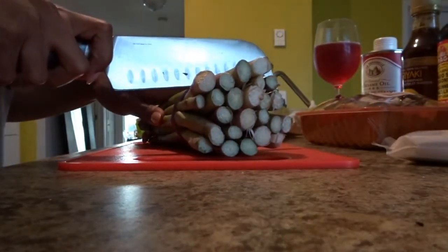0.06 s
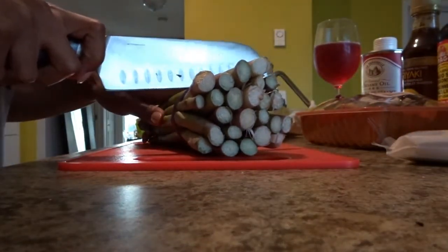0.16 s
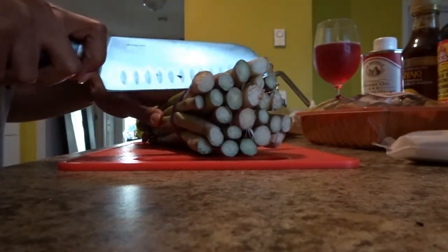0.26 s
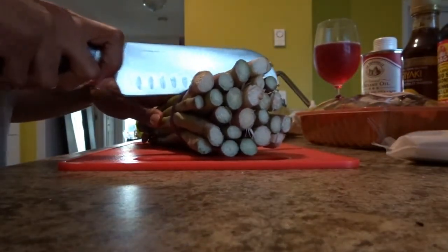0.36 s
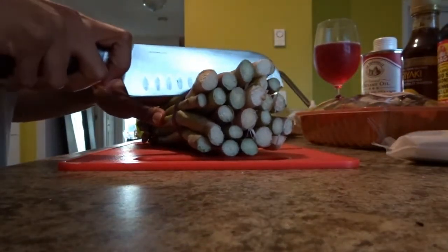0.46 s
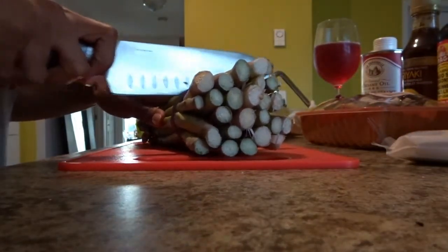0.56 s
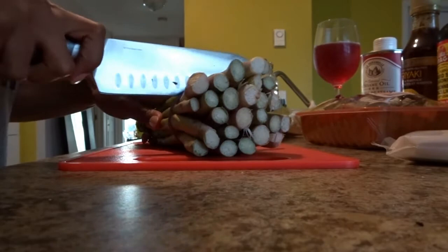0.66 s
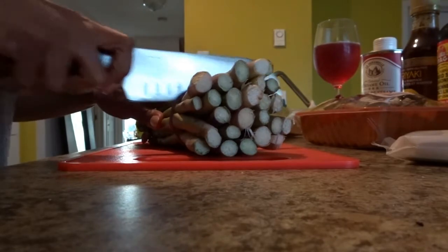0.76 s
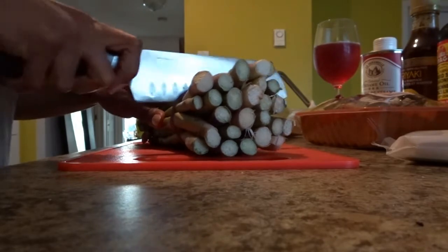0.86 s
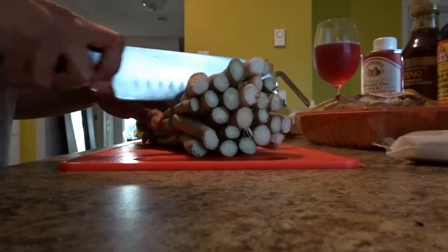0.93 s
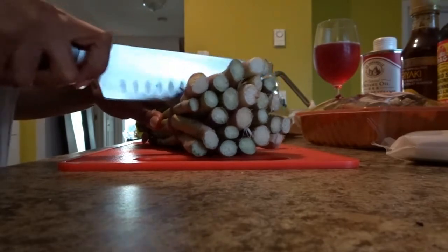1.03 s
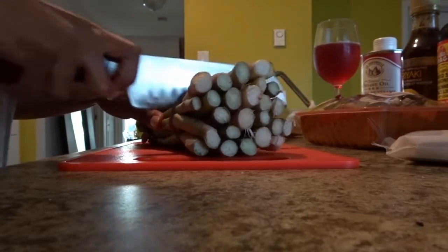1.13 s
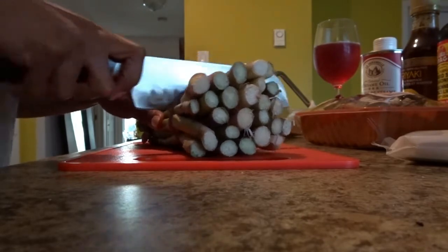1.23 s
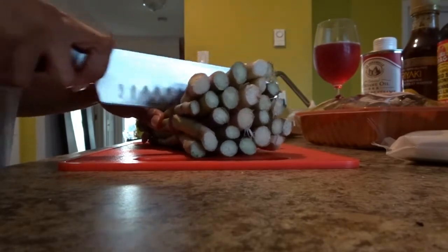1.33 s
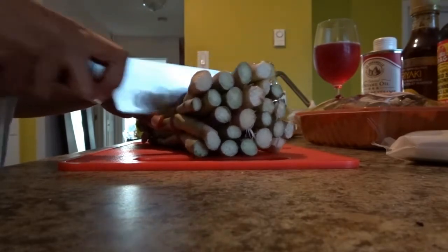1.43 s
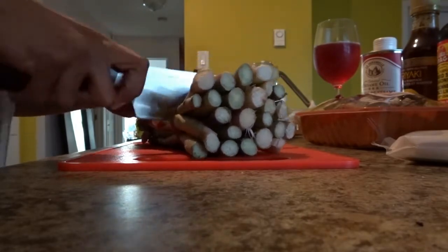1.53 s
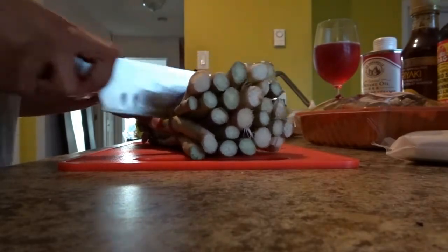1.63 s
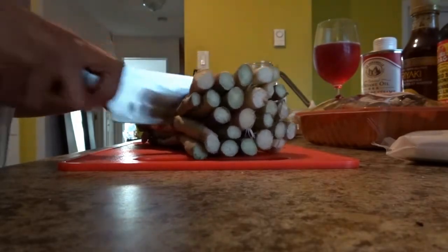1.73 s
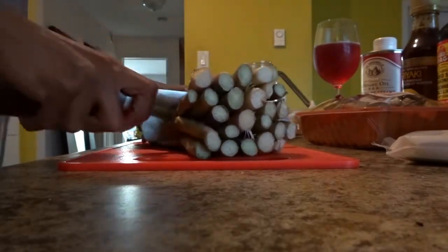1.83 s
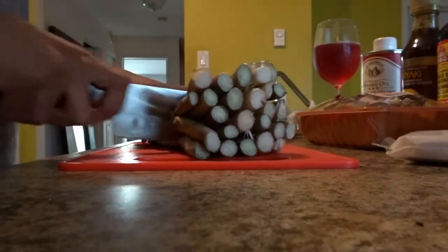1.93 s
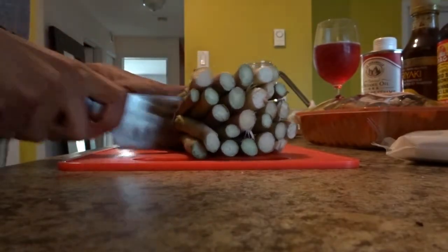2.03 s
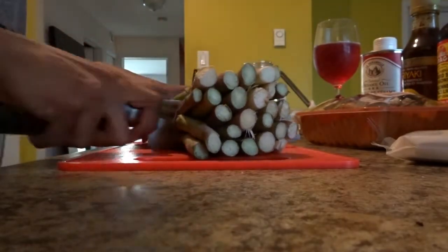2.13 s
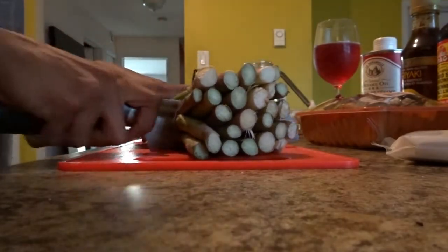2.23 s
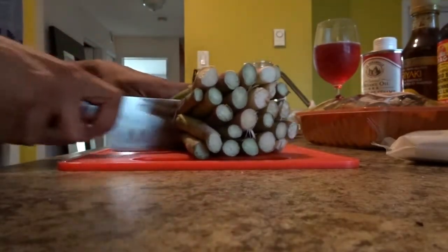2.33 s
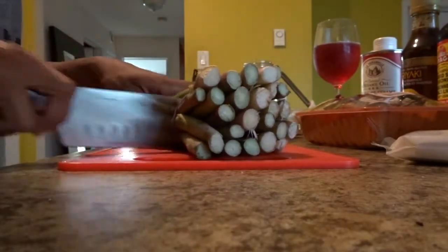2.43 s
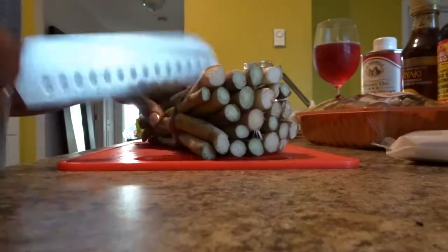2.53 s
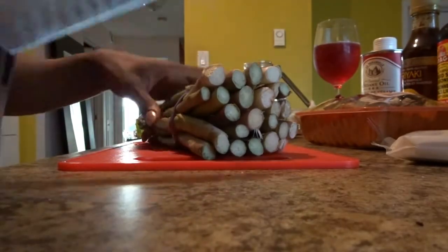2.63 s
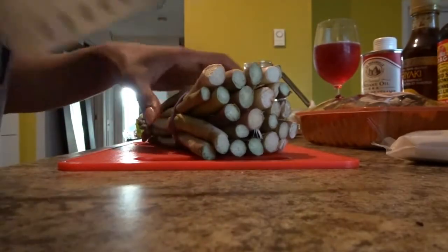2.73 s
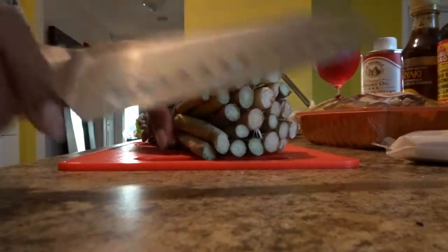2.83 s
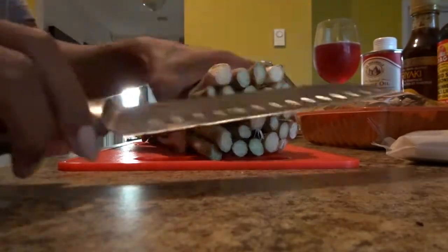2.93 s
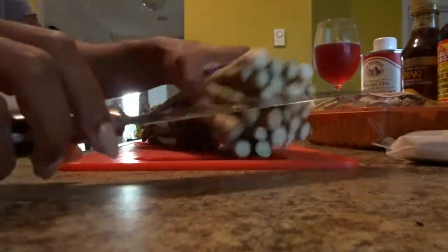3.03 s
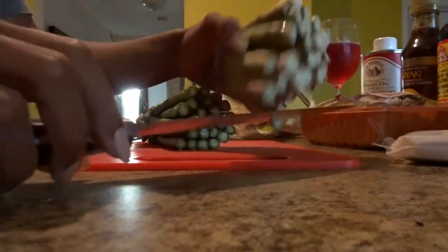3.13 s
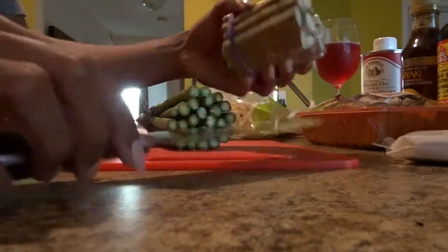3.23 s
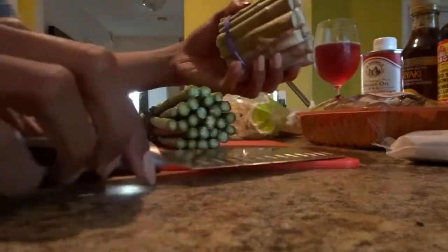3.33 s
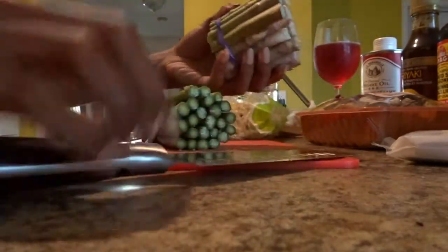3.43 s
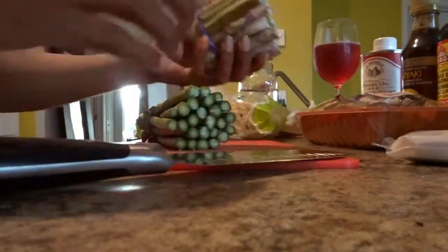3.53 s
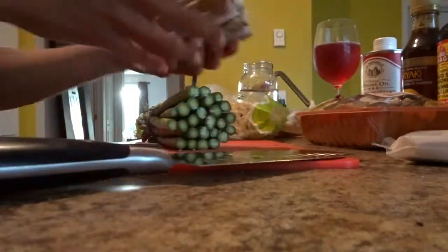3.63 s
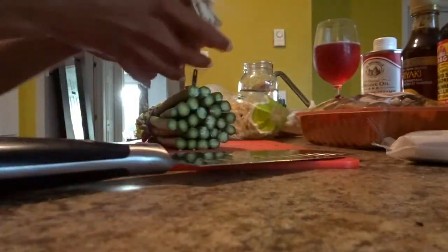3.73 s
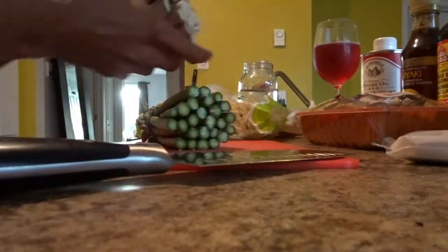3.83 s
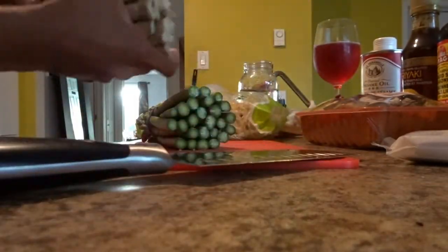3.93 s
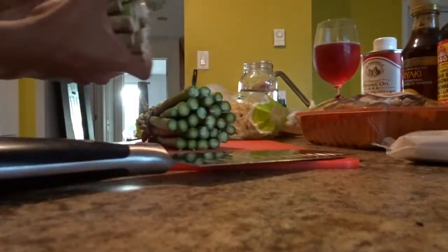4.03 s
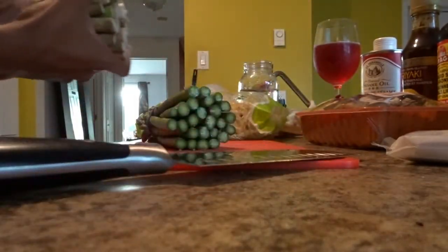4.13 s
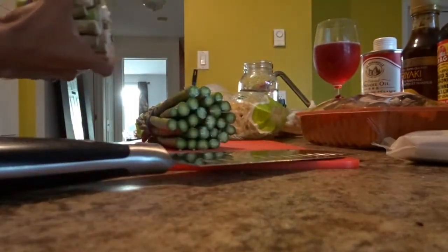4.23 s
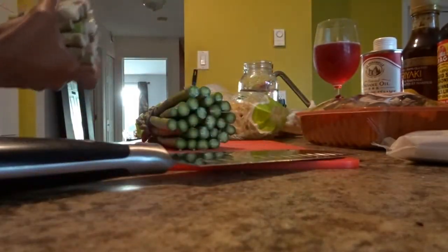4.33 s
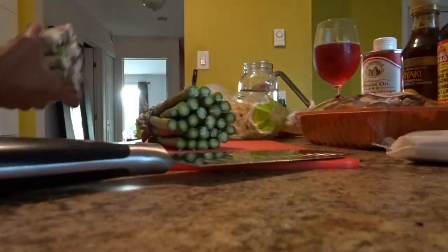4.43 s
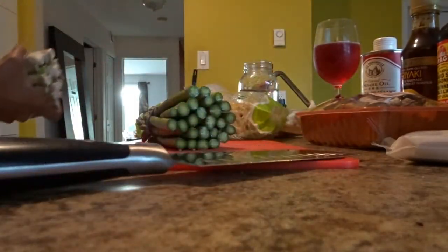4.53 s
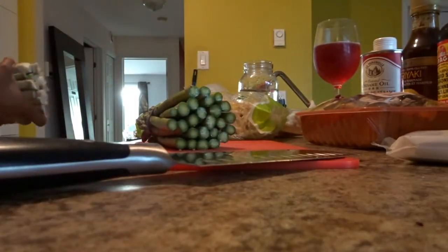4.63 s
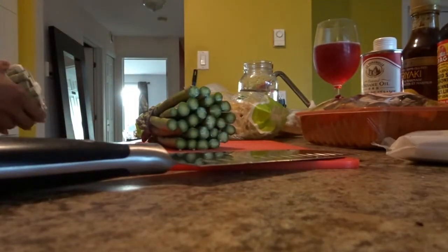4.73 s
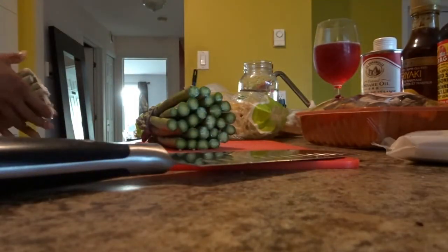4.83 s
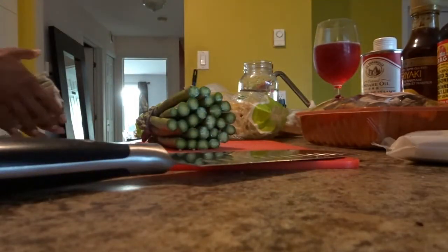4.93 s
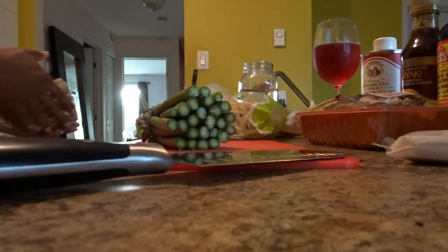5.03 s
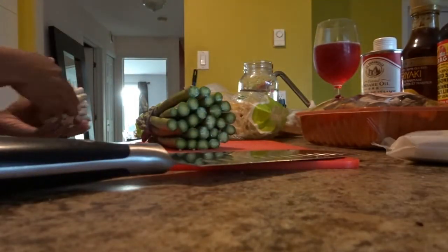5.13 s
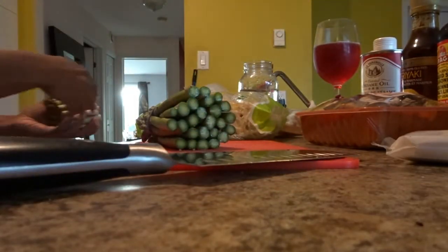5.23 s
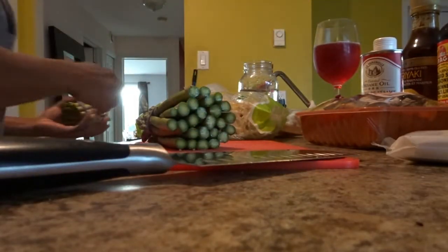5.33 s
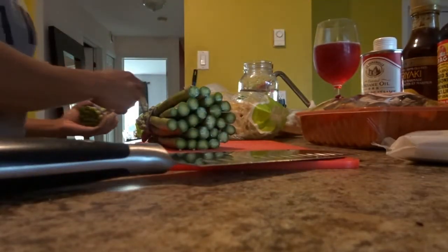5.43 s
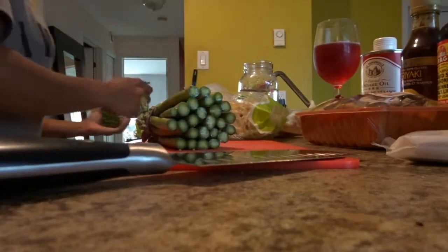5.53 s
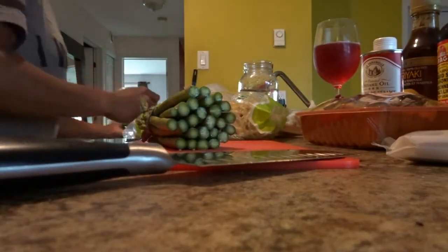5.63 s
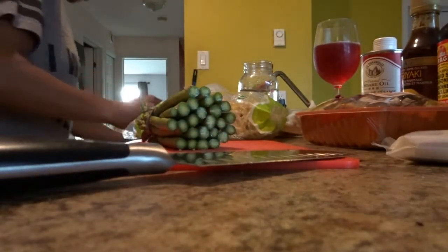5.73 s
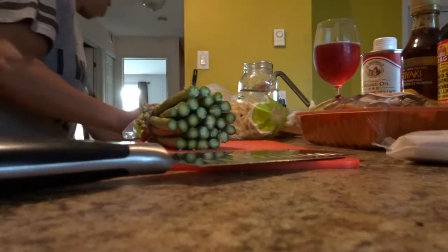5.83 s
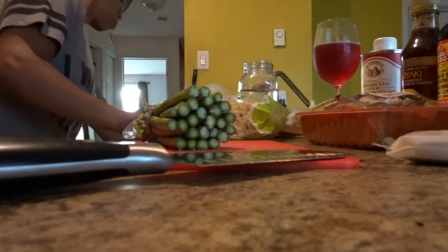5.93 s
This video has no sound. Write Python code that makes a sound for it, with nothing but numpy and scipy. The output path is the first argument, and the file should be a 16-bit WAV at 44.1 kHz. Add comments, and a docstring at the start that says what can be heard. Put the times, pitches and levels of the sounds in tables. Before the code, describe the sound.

Close, crisp stereo pickup in a small, lively kitchen. A knife pushes slowly through bundled green stalks with growing crackles, snaps and a tiny squeak, then lands hard on a plastic board. The blade slides out, the board is knocked again, and the knife drops on the counter with thuds and metallic clatter. Faint rubbing and light taps of stalks follow over low rumble and a distant engine.

```python
"""Fibres crackle in a bundle of green onions as a large knife is pressed through, over a rumble and a far engine.
Stalks snap and the edge lands on a plastic board; the blade is drawn out, taps down once more and is dropped
on the counter, handle first, where it clatters; hands carry off the cut stalks.
Crackle and friction are coloured grains, snaps are bursts, and blows are struck modes with noise, in a small kitchen."""
import sys
import numpy as np
from scipy import signal
from scipy.fft import rfft, irfft
from scipy.io import wavfile

SR = 44100
rng = np.random.default_rng(int(sys.argv[2]) if len(sys.argv) > 2 else 0)


def store_wav(level_fs):
    """Save 16-bit WAV to argv[1]."""
    pcm = np.round(np.clip(np.atleast_2d(level_fs), -1, 1) * 32767)
    wavfile.write(sys.argv[1], SR, pcm.T.astype(np.int16))


N = 263277
TIME = np.arange(N) / SR
STEREO_SPLIT_HZ = 2800   # left and right differ mainly above this
LEFT_RIGHT = np.array([[1], [-1]])


def amp(db):
    """Decibels to gain."""
    return 10 ** (np.asarray(db) / 20)


def rms_one(x):
    """Scale to rms 1."""
    return x / np.sqrt(np.mean(x ** 2) + 1e-20)


def gain_curve(rows):
    """Gain through the (time, dB) points, silent outside them."""
    s, level_db = np.transpose(rows)
    return amp(np.interp(TIME, s, level_db)) * (TIME >= s[0]) * (TIME <= s[-1])


def at_hz(points, hz):
    """Read a table on a log-frequency axis."""
    f, value = np.transpose(points)
    return np.interp(np.log(np.maximum(hz, 1)), np.log(f), value)


def butter(x, hz, kind, order=2):
    """Causal Butterworth filter."""
    hz = np.clip(hz, 10, SR / 2 - 1000)
    return signal.sosfilt(signal.butter(order, hz, kind, fs=SR, output="sos"), x)


def fade(t, t60):
    """Exponential decay, 60 dB down after t60 seconds."""
    return np.exp(-np.log(1000) * t / t60)


def coloured(x, spectrum):
    """Minimum-phase filter with the given spectrum: nothing sounds early."""
    size = 4096
    cepstrum = irfft(np.log(amp(at_hz(spectrum, np.fft.rfftfreq(size, 1 / SR)))))
    # fold the cepstrum onto its causal half
    cepstrum[1:size // 2] *= 2
    cepstrum[size // 2 + 1:] = 0
    kernel = irfft(np.exp(rfft(cepstrum)))
    return signal.fftconvolve(np.atleast_2d(x), kernel[None], axes=1)[:, :x.shape[-1]]


def diffuse(size):
    """Noise from all sides: alike left and right in the bass, unrelated in the treble."""
    mid, side = rng.standard_normal((2, size))
    return mid + butter(side, STEREO_SPLIT_HZ, "high", order=1) * LEFT_RIGHT


def wobble(size, hz):
    """Random wavering up to the given rate; rms 1."""
    return rms_one(butter(rng.standard_normal(size), hz, "low"))


def add(out, s, sound):
    """Mix a sound in at time s."""
    at = round(s * SR)
    out[:, at:at + sound.shape[-1]] += sound[..., :N - at]


def grains(per_s, spread_db, colour, width):
    """Tiny fractures at random moments, of uneven size, their treble scattered left and right; rms 1."""
    born = rng.random(N) < per_s / SR
    size = amp(spread_db * np.minimum(rng.exponential(1, N), 4)) * rng.choice([-1, 1], N)
    ticks = born * size
    side = width * butter(ticks * rng.uniform(-1.08, 1, N), STEREO_SPLIT_HZ, "high")
    return rms_one(coloured(ticks + side * LEFT_RIGHT, colour))


BUILD_UP_DB = 30.5   # rise over one build-up time


def swells(rows, fall_db_per_s):
    """Gain of a row of yieldings: each builds up to its moment, then falls away."""
    power = 0
    for s, db, build_s in rows:
        below_db = np.maximum(BUILD_UP_DB * (s - TIME) / build_s, fall_db_per_s * (TIME - s))
        power = power + amp(db - np.minimum(below_db, 120)) ** 2
    return np.sqrt(power)


LOWEST_MODE_HZ = 86
BUZZ_HZ = 220   # fastest chatter of a loose body


def blows(rows, modes, colour, dense_db, dense_t60, tick_db, buzz=0):
    """Each blow gives a tick, rings the strong modes and a thicket of weak ones; soft contacts lose the treble."""
    out, t = np.zeros((2, N)), TIME[:SR * 3 // 4]
    hz, level_db, t60 = np.transpose(modes)
    shapes = np.sin(2 * np.pi * hz[:, None] * t) * fade(t, t60[:, None])
    signs = (-1) ** np.arange(len(hz))   # neighbouring modes start in opposite directions
    early = SR // 50   # levels are matched over the first 20 ms

    def levelled(x):
        return x / x[:, :early].std()

    for s, db, bright_hz in rows:
        # high modes beam to one side
        lean = rng.uniform(-1.05, 1, len(hz)) * hz / np.hypot(hz, STEREO_SPLIT_HZ)
        strength = signs * amp(level_db + rng.normal(0, 1, len(hz)))
        ring = (strength * [1 + lean, 1 - lean]) @ shapes
        ring = ring * (1 + buzz * wobble(len(t), BUZZ_HZ))   # a loose body chatters
        dense = coloured(diffuse(len(t)) * fade(t, dense_t60), colour)
        tick = coloured(1. * (t == 0), colour)
        hit = levelled(ring) + amp(dense_db) * levelled(dense) + amp(tick_db) * levelled(tick)
        hit = butter(hit, bright_hz, "low")
        add(out, s, amp(db) * levelled(hit))
    return butter(out, LOWEST_MODE_HZ, "high", order=3)   # small bodies radiate no deep bass


# Colour of the low rumble: freq_hz, density_db
RUMBLE_COLOUR = [(22, -24), (115, -5.5), (205, -2), (347, -7.5), (496, -12), (602, -14.5), (1760, -31),
                 (5030, -40), (14700, -52.5), (16000, -93)]
# Hums in the house: pitch_hz, width_hz, level_db
HUMS = [(115.9, 9.4, -52), (399, 22.6, -57.5)]


def background():
    """Low rumble as coloured noise, and unsteady hums as narrow bands of noise."""
    out = amp(-45) * rms_one(coloured(diffuse(N), RUMBLE_COLOUR))
    for hz, width_hz, db in HUMS:
        band = [hz - width_hz / 2, hz + width_hz / 2]
        hum = butter(rng.standard_normal(N + SR), band, "band")[SR:]   # skip the filter's build-up
        out = out + amp(db) * rms_one(hum)
    return out


# A far engine swells and fades as it pulls, then eases off: middle_s, length_s, pitch_hz, glide_hz_per_s, level_db
ENGINE_PULLS = [(0.467, 0.93, 185, 26.5, -45), (1.186, 0.38, 197, 11, -43.5),
                (2.197, 0.75, 183.8, 23.5, -45), (4.94, 2.9, 161.4, -5, -51.5)]
ENGINE_WAVER_DB, ENGINE_WAVER_HZ = -3.5, 8


def far_engine():
    """Each pull is one gliding note under an arch of level, wavering on its way in."""
    out = 0
    for middle, length, hz, glide_hz_per_s, db in ENGINE_PULLS:
        t = TIME - middle
        arch = np.cos(np.pi * np.clip(t / length, -.5, .5))
        note = np.sin(2 * np.pi * np.cumsum(hz + glide_hz_per_s * t) / SR)
        out = out + amp(db) * arch * rms_one(note)
    return out * amp(ENGINE_WAVER_DB * wobble(N, ENGINE_WAVER_HZ))


# Decay of the small kitchen: freq_hz, t60_s
ROOM_T60 = [(100, 0.26), (400, 0.65), (1500, 0.48), (4500, 0.52), (9000, 0.16), (16000, 0.49)]


def kitchen(x, wet_db, delay_s):
    """Reflections swell in over a short delay and die away at a different rate in each band."""
    t, edges = TIME[:SR * 3 // 4], np.geomspace(70, 18000, 9)
    tail = 0
    for lo, hi in zip(edges, edges[1:]):
        t60 = at_hz(ROOM_T60, np.sqrt(lo * hi))
        tail = tail + butter(diffuse(len(t)), [lo, hi], "band") * fade(t, t60)
    tail = tail * np.minimum(t / delay_s, 1) ** 2
    tail = tail / np.sqrt(np.sum(tail ** 2) / 2)
    return x + amp(wet_db) * signal.fftconvolve(x, tail, axes=1)[:, :N]


# Light taps of the cut stalks as they are handled: start_s, level_db, brightness_hz
TAPS = [(4.644, -47, 2000), (5.191, -42.5, 2480), (5.224, -43, 3000), (5.79, -55, 5030)]
# What the taps ring: pitch_hz, level_db, t60_s
TAP_MODES = [(756, 3.9, 0.053), (1440, 6, 0.077), (1750, 1.8, 0.08), (2270, 2.6, 0.09)]
# Colour of stalks on skin, also tinting the taps: freq_hz, density_db
DULL_RUB_COLOUR = [(100, -7), (900, 6.5), (1600, 5), (2400, 5.5), (3200, -1), (4700, -5.5), (8000, -24),
                   (16000, -48)]


def stalk_taps():
    """Cut stalks tap lightly, exciting a few short modes with a strong tick."""
    return blows(TAPS, TAP_MODES, DULL_RUB_COLOUR, dense_db=4, dense_t60=0.15, tick_db=5.5)


RUB_ATTACK_SHARE, RUB_RELEASE_T60 = 0.63, 0.43   # share of the rub's length; seconds


def stroke(start, length):
    """Soft attack, hold and release of one rub."""
    t = TIME - start
    attack = np.sin(np.pi / 2 * np.clip(t / (RUB_ATTACK_SHARE * length), 0, 1)) ** 2
    return attack * fade(np.clip(t - length, 0, 2), RUB_RELEASE_T60)


# Stalks rubbing on hands and on each other: start_s, length_s, level_db, crispness_db
RUBS = [(2.977, 0.096, -54.5, 9.5), (3.152, 0.048, -62, 9.5), (3.731, 0.064, -58, 14),
        (3.817, 0.013, -57.5, 2), (3.908, 0.025, -64, 8.5), (4.254, 0.091, -58.5, -2),
        (4.593, 0.18, -54.5, -11), (4.717, 0.24, -49.5, -4), (5.056, 0.096, -56.5, -3),
        (5.192, 0.034, -51, -6), (5.338, 0.077, -49.5, -6.5), (5.395, 0.096, -53.5, -1.5),
        (5.758, 0.022, -57, -11), (5.904, 0.011, -64, 9)]
# Colour of stalks on each other: freq_hz, density_db
CRISP_RUB_COLOUR = [(1000, -29), (4500, -0.5), (6500, -3), (9000, -8.5), (15000, -19.5)]
# The cut half of the bundle tumbles and crunches: peak_s, level_db, build_up_s
TUMBLE = [(2.957, -35, 0.059)]
# Colour of sliding, for the tumble and the blade drawn out: freq_hz, density_db
SLIDE_COLOUR = [(290, -29), (500, -6.5), (788, -15.5), (922, -16), (1410, -9), (1720, -15), (2100, -13),
                (3610, -13.5), (15000, -31.5)]
TUMBLE_FALL_DB_PER_S, TUMBLE_TOP_HZ = 418, 8000   # soft cut faces make little treble


def handling():
    """Fine, dense friction of the cut stalks: dull on skin, crisp on each other, grainy when they tumble."""
    rubs = np.array([amp(db) * stroke(s, length) for s, length, db, _ in RUBS])
    crispness = amp(np.array(RUBS)[:, -1:])
    dull_gain = amp(3.5) * np.linalg.norm(rubs, axis=0)
    dull = dull_gain * grains(per_s=5000, spread_db=0, colour=DULL_RUB_COLOUR, width=1.8)
    crisp_gain = amp(-3.0) * np.linalg.norm(rubs * crispness, axis=0)
    crisp = crisp_gain * grains(per_s=2500, spread_db=2.5, colour=CRISP_RUB_COLOUR, width=1.27)
    tumble_gain = swells(TUMBLE, TUMBLE_FALL_DB_PER_S)
    tumble = tumble_gain * grains(per_s=720, spread_db=-1.5, colour=SLIDE_COLOUR, width=0.89)
    return dull + crisp + butter(tumble, TUMBLE_TOP_HZ, "low")


# The handle on the counter: start_s, level_db, brightness_hz
THUDS = [(3.2425, -17, 2420), (3.2755, -20.5, 1800), (3.3368, -16, 2800), (3.393, -27, 910),
         (3.421, -23.5, 730), (3.497, -37, 400), (3.60, -34, 1240)]
# The counter's strong modes: pitch_hz, level_db, t60_s
COUNTER_MODES = [(278, -1, 0.16), (340, -0.5, 0.046), (373.7, 1.5, 0.18), (480, -4.5, 0.34),
                 (576, -15, 0.2), (744, -9.5, 0.18), (1268, -9.5, 0.067), (1525, -13, 0.13)]
# The counter's colour: freq_hz, density_db
COUNTER_COLOUR = [(70, -33), (160, -12), (270, 4), (380, 1), (480, -3), (650, -12), (950, -9.5),
                  (1400, -23.5), (2500, -26), (4000, -36.5), (10000, -30.5)]


def handle_thuds():
    """The dropped handle knocks on the counter and rings its low, short modes."""
    return blows(THUDS, COUNTER_MODES, COUNTER_COLOUR, dense_db=1.5, dense_t60=0.16, tick_db=-2.0)


# The flat of the blade clattering down: start_s, level_db, brightness_hz
CLATTER = [(3.3605, -20, 12000), (3.378, -20, 8000), (3.3925, -19.5, 14200), (3.407, -17, 10100),
           (3.4545, -23, 8950), (3.474, -24.5, 12800), (3.4785, -19.5, 11800), (3.494, -30, 12000)]
# The blade's strong modes: pitch_hz, level_db, t60_s
BLADE_MODES = [(598, -2, .22), (680, -6, .2), (874, -3, .16), (938, -3, .16), (1215, -7, .2),
               (1605, -8, .15), (1741, -8, .18), (1940, -7, .2), (2290, -8, .22), (2450, -9, .25),
               (2945, -10, .16), (3620, -2, .19), (3728, -7, .2), (3880, -6, .14), (4305, 7.5, .19),
               (4510, -6, .16), (4824, -6, .14), (4985, -6, .22), (5238, 1, .16), (5626, -6, .12),
               (6560, -10, .18), (7115, -10, .14), (7950, -3.5, .13), (11400, -6, .1)]
# The blade's colour, shared by clatter, slaps and flicks: freq_hz, density_db
BLADE_COLOUR = [(120, -12), (200, -3), (579, -9), (763, -15), (968, -6), (1080, -19.5), (1370, -12.5),
                (3200, -20.5), (4350, -23.5), (6300, -23.5), (12000, -25), (16000, -35)]


def blade_clatter():
    """The loose blade rings its many steel modes and chatters on the counter."""
    return blows(CLATTER, BLADE_MODES, BLADE_COLOUR, dense_db=-0.5, dense_t60=0.21, tick_db=-4, buzz=.35)


# The flat of the blade slapping the board: start_s, level_db, brightness_hz
SLAPS = [(3.4785, -20.5, 3570), (3.4945, -22, 3570)]
# Modes of the air squeezed under the blade: pitch_hz, level_db, t60_s
SLAP_MODES = [(992, -4.5, 0.036), (1020, -4, 0.033), (1214, -4, 0.065), (1285, -9, 0.063)]


def flat_slaps():
    """Air trapped between blade and board rings briefly around 1 kHz under a longer wash of weak modes."""
    return blows(SLAPS, SLAP_MODES, BLADE_COLOUR, dense_db=-3.5, dense_t60=0.45, tick_db=-26.0)


# The blade springing free of the stalks: start_s, level_db, brightness_hz
FLICKS = [(2.43, -49.5, 9000), (2.578, -52.5, 4930)]
# The blade held clear of everything rings purer and longer: pitch_hz, level_db, t60_s
FREE_BLADE_MODES = [(2288, 2.5, .42), (3714, -2, .55), (4300, -3, .35), (4985, -5, 1.2), (5238, 1, .62),
                    (5857, -1.5, .6), (7967, 2, .14)]


def blade_flicks():
    """Springing free sets the blade ringing on in the air, undamped by any contact."""
    return blows(FLICKS, FREE_BLADE_MODES, BLADE_COLOUR, dense_db=-1, dense_t60=0.077, tick_db=-15)


# Knife edge and stalks on the board: start_s, level_db, brightness_hz
CHOPS = [(1.832, -33.5, 510), (1.858, -32, 412), (2.0912, -17, 5050), (2.099, -20.5, 388),
         (2.122, -28, 2000), (2.135, -30, 400), (2.178, -31.5, 910), (2.931, -26.5, 1470),
         (2.948, -32, 900)]
# The plastic board's strong modes: pitch_hz, level_db, t60_s
BOARD_MODES = [(168, -8, 0.17), (224, -14, 0.31), (261, 7.5, 0.087), (304.7, 2, 0.22), (400, -11, 0.097),
               (500, -7, 0.14), (574, 0, 0.13), (813, -2.5, 0.24), (1179, 5, 0.1), (1966, 2, 0.26),
               (2170, -7, 0.16), (2220, -12, 0.26)]
# The board's colour: freq_hz, density_db
BOARD_COLOUR = [(80, -9), (160, -3.5), (260, 1.5), (350, -1.5), (480, -2.5), (680, -2.5), (1100, -8),
                (1400, -7), (1900, -5.5), (2600, -12), (3500, -15), (6000, -22), (12000, -26)]


def board_chops():
    """Edge and stalks strike the plastic board, which answers with a dense, broad knock."""
    return blows(CHOPS, BOARD_MODES, BOARD_COLOUR, dense_db=4.5, dense_t60=0.24, tick_db=3.0)


# The wet blade sticks on a stalk and slips with a squeak: slip_s, level_db, build_up_s
SQUEAKS = [(.572, -43.5, 0.095), (.618, -50, .05), (.69, -47, .13), (.765, -46, 0.054)]
SQUEAK_HZ, SQUEAK_SAG_HZ_PER_S, SQUEAK_FALL_DB_PER_S = 1465, 200, 502   # pitch at the first slip
SQUEAK_JITTER_HZ, SQUEAK_ROUGH_HZ = 45, 150   # rms pitch jitter; fastest roughness


def squeak():
    """Stick and slip of wet steel: a rough, broken note that sags as the blade slows."""
    sag = SQUEAK_SAG_HZ_PER_S * (TIME - SQUEAKS[0][0])
    hz = SQUEAK_HZ - sag + SQUEAK_JITTER_HZ * wobble(N, SQUEAK_ROUGH_HZ)
    note = np.sin(2 * np.pi * np.cumsum(hz) / SR) * (1 + wobble(N, SQUEAK_ROUGH_HZ) / 2)
    return swells(SQUEAKS, SQUEAK_FALL_DB_PER_S) * rms_one(note)


def scraped(x, ring_db, t60):
    """Scraping also sets the blade singing, damped by the stalks on either side."""
    t = TIME[:SR // 10]
    steel = sum(np.sin(2 * np.pi * hz * t) for hz, _, _ in FREE_BLADE_MODES) * fade(t, t60)
    singing = signal.fftconvolve(x, steel[None], axes=1)[:, :N]
    return x + amp(ring_db) * x.std() * rms_one(singing)


# The blade sliding back out of the cut: time_s, level_db
DRAW = [(2.24, -58), (2.32, -45.5), (2.39, -40.5), (2.435, -34.5), (2.46, -48), (2.58, -69), (2.76, -87)]


def blade_draw():
    """The withdrawn blade slides on the stalks in dense grains and sings faintly."""
    slide = amp(0.4) * gain_curve(DRAW) * grains(per_s=4000, spread_db=0.5, colour=SLIDE_COLOUR, width=0.94)
    return scraped(slide, ring_db=-10.5, t60=0.069)


# The edge grinds on in the board after it lands: peak_s, level_db, build_up_s
GRINDS = [(2.125, -25.5, 0.042), (2.158, -34, 0.086)]
# Colour of the grinding: freq_hz, density_db
GRIND_COLOUR = [(300, -29), (1300, -3.5), (1700, -5.5), (1840, -1.5), (2050, -2.5), (2450, -5.5),
                (3500, -16.5), (12000, -33.5)]


def board_grind():
    """The edge bites into plastic in a swelling run of uneven grains."""
    return swells(GRINDS, fall_db_per_s=168) * grains(per_s=2000, spread_db=5.5, colour=GRIND_COLOUR, width=0.49)


# Single stalks bursting: start_s, level_db, pitch_hz
SNAPS = [(0.132, -31, 4270), (0.2443, -35, 5000), (.447, -23.5, 5870), (0.7541, -20, 4600),
         (.82, -23, 9000), (1.1581, -9.5, 7200), (1.164, -19, 8000), (1.189, -14, 8450),
         (1.447, -13.5, 5100), (1.4674, -14.5, 3000), (1.491, -12.5, 4500), (1.506, -8.5, 4370),
         (1.606, -31, 5960), (1.7575, -10, 4570), (1.7662, -11.5, 6500), (1.7725, -16, 5500),
         (1.801, -19, 8000), (1.804, -9, 5000), (1.8166, -7, 4220), (1.835, -13, 3800), (1.851, -18, 5500),
         (1.86, -12.5, 7140), (1.8715, -28, 7000), (1.887, -31, 3000), (1.913, -17.5, 9000),
         (1.923, -23, 9000), (1.9288, -30, 6000), (1.957, -27, 7000), (2.075, -13, 6000),
         (2.0772, -5, 5670), (2.088, -15, 5000), (2.092, -12, 5000), (2.915, -33, 4000), (5.193, -34, 4500)]
# Colour of a burst, also of single fibres: freq_hz, density_db
SNAP_COLOUR = [(60, -70), (900, -18.5), (2000, 3), (3500, 3), (6000, 5), (8500, -3.5), (12000, -3),
               (16000, -17)]


def snaps(tear_db, tear_t60, ring_db, pan_db):
    """A stalk gives way with a sharp crack and a brief burst of tearing, tinted by the pitch of its hollow tube."""
    out, t = np.zeros((2, N)), TIME[:SR // 20]
    for s, db, hz in SNAPS:
        tearing = amp(tear_db) * rng.standard_normal(len(t)) * fade(t, tear_t60)
        crack = coloured((t == 0) + tearing, SNAP_COLOUR)
        crack = crack + amp(ring_db) * butter(crack, [hz / 1.1, hz * 1.1], "band", order=1)
        crack = butter(crack, 2.04 * hz, "low")   # thick, low-pitched stalks crack duller
        pan = amp(pan_db * rng.standard_normal() * LEFT_RIGHT)
        add(out, s, amp(db) * pan * crack / np.abs(crack).max())
    return out


# Steady crackle under the leaning blade, rising and easing: time_s, level_db
PRESSURE = [(0, -65), (.22, -62.5), (.36, -51.5), (1.35, -55), (1.8, -66), (2.09, -55), (2.28, -53.5),
            (2.56, -54.5), (2.7, -68)]
# The edge loads one stalk after another until it gives way: give_way_s, level_db, build_up_s
STALKS = [(.04, -51.5, 0.012), (.135, -51.5, 0.044), (.295, -47, 0.13), (.45, -42.5, 0.22),
          (.565, -44.5, 0.13), (.67, -38, 0.13), (.755, -31.5, 0.04), (.83, -36, 0.051), (.945, -42, 0.19),
          (1.055, -45.5, 0.11), (1.18, -33.5, 0.18), (1.28, -37.5, 0.13), (1.46, -31.5, 0.038),
          (1.515, -30.5, 0.21), (1.615, -35.5, 0.14), (1.805, -26.5, 0.055), (1.856, -26, 0.23),
          (1.93, -31.5, 0.024), (2.025, -39, 0.057), (2.077, -21, 0.028)]
# Colours of tough skin and soft pulp: freq_hz, density_db
SKIN_COLOUR = [(150, -26), (800, -37), (2000, 2.5), (3000, -1.5), (4500, 1.5), (6200, 2), (8500, -4),
               (12000, -7), (16000, -15.5)]
PULP_COLOUR = [(50, -56.5), (150, 10), (300, 13), (650, 1.5), (950, 6), (1500, 5), (2300, -37.5),
               (3500, -39), (7000, -34)]
GIVE_WAY_DB_PER_S = 336   # fall after a stalk gives way
BOARD_REACHED_S, STOP_DB_PER_S = 2.081, 696   # the board stops the blade and cuts the last swell short
CLUMP_DB, CLUMP_HZ = 1.5, 130   # fibres tear in quick, uneven bunches
FIBRE_LOW_HZ = 3000   # thin fibres tick higher than whole stalks


def cutting():
    """Skin and pulp crackle under the edge and single fibres tick, all following the push of the blade."""
    stop = amp(-STOP_DB_PER_S * np.clip(TIME - BOARD_REACHED_S, 0, .1))
    push = np.hypot(gain_curve(PRESSURE), swells(STALKS, GIVE_WAY_DB_PER_S) * stop)
    clumps = amp(CLUMP_DB * wobble(N, CLUMP_HZ))
    crackle = clumps * push * grains(per_s=2400, spread_db=1.5, colour=SKIN_COLOUR, width=0.62)
    ticks = grains(per_s=92, spread_db=0.5, colour=SNAP_COLOUR, width=0.8)
    fibres = amp(-13.0) * push * butter(ticks, FIBRE_LOW_HZ, "high", order=1)
    pulp = grains(per_s=1500, spread_db=3.5, colour=PULP_COLOUR, width=1)
    mush = amp(-15.0) * push ** 0.8 * pulp   # hard pushes are crisper
    return crackle + fibres + mush


def scene():
    """Cutting, blows and handling ring in the kitchen, over the rumble and the far engine."""
    knocks = handle_thuds() + blade_clatter() + flat_slaps() + blade_flicks() + board_chops()
    knocks = knocks * amp(-0.071 * LEFT_RIGHT)   # practically centred
    onions = stalk_taps() + handling() + squeak() + blade_draw() + board_grind() + cutting()
    onions = onions + snaps(tear_db=-11.5, tear_t60=0.0084, ring_db=2.0, pan_db=2.5)
    near = kitchen(onions, wet_db=-6.5, delay_s=0.0017) + kitchen(knocks, wet_db=-10.0, delay_s=0.0063)
    return background() + far_engine() + near


PEAK_LIMIT, CUTOFF_HZ = 0.6, 16100   # full scale is 1


def record(dry):
    """The highest peaks are rounded and the top is cut steeply."""
    rounded = dry / (1 + (dry / PEAK_LIMIT) ** 4) ** (1 / 4)
    return signal.sosfilt(signal.ellip(10, .1, 90, CUTOFF_HZ, fs=SR, output="sos"), rounded)


dry = scene()
out = record(dry)
store_wav(out)
```